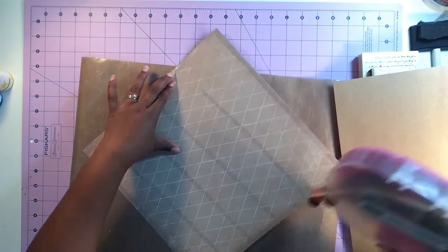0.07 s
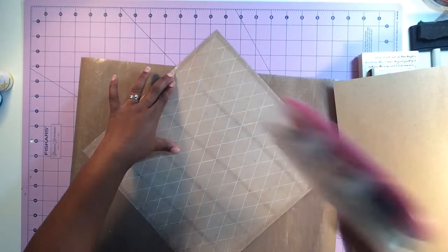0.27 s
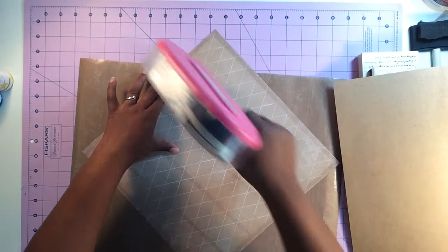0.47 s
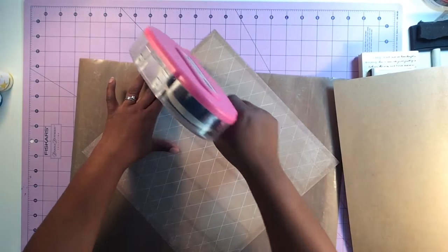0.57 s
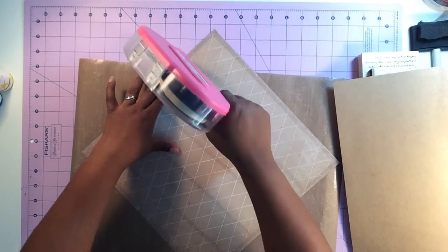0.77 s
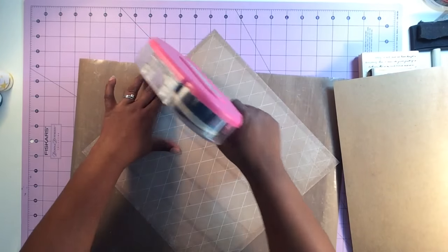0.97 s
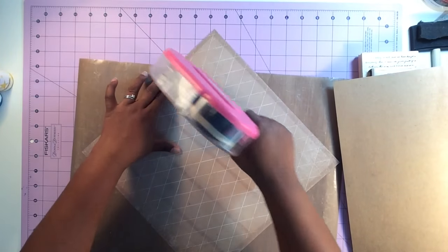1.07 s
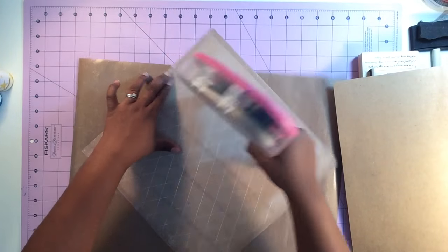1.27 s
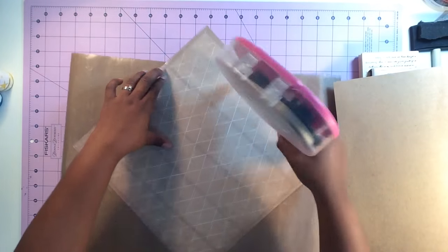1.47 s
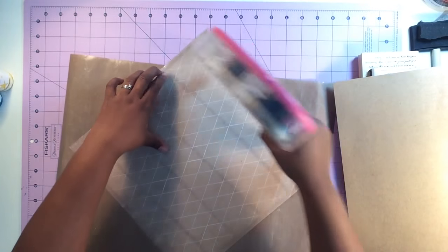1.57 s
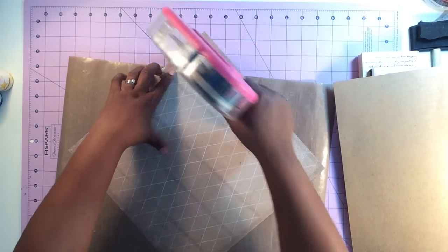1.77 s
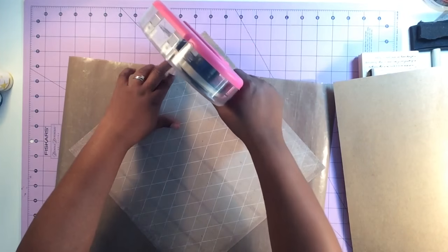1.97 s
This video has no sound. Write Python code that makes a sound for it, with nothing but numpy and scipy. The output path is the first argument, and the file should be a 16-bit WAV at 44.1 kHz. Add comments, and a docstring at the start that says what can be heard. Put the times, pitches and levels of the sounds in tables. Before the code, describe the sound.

Close up in a small room, a loose plastic tape dispenser gives one loud hollow crack with smaller clicks, knocks down on a papered craft table, rubs unevenly as tape peels, and releases with a crisp snap.

```python
"""Loose plastic clacks and rattles close to the microphone as a big tape runner is swung over a craft table.
It lands on paper on a cutting mat with a low knock, is drawn along while the tape unrolls, and lifts off with
a sharp snap. Blows are bursts of tiny impacts coloured by resonances; rubbing is a dense rain of random grains.
A small room rings briefly, the table knocks and rumbles faintly under the hands, and the air hisses softly."""
import sys
import numpy as np
from scipy import signal
from scipy.fft import rfft, irfft
from scipy.io import wavfile
from scipy.ndimage import uniform_filter1d

SR = 44100
rng = np.random.default_rng(int(sys.argv[2]) if len(sys.argv) > 2 else 0)


def wav_record(signal):
    """Record a signal, one row per channel, as 16-bit PCM in the file named by sys.argv[1]."""
    frames = np.transpose(np.atleast_2d(signal))
    bounded = np.clip(frames, -1, 1)
    # unit amplitude maps onto the largest positive 16-bit level
    quanta = np.round(bounded * 32767).astype(np.int16)
    wavfile.write(sys.argv[1], SR, quanta)


N = 89390


def case():
    """The loose plastic case clacks and scrapes: a hollow crack and a thin lingering ring."""
    # Clacks and short scrapes of the case. Each row: start in seconds, level in dB, rise of the push in
    # seconds, its t60 in seconds, tilt in dB per octave, frequency in Hz above which it is dull.
    clacks = [(.013, -52, 0.00334, 0.039, -5.5, 2000), (.0312, -50.5, 0.00085, 0.024, 3, 2300),
              (.106, -54.5, 0.00061, 0.046, 2, 11000), (.114, -67, .0005, 0.023, 8, 14000),
              (.1305, -47, 0.0002, 0.062, 2, 12000), (.142, -35.5, 0.0033, 0.13, 3.5, 10300),
              (.1775, -20, 0.0036, 0.063, 0.5, 16040), (.197, -37, 0.0064, 0.12, 7, 16000),
              (.232, -36.5, 0.0051, 0.15, 1, 7000), (.337, -51, 0.0021, 0.22, 6, 14000),
              (.383, -59.5, 0.0028, 0.071, 1, 9070), (.4415, -48, 0.0027, 0.066, 1, 7200),
              (.4615, -44.5, 0.0029, .06, -3, 2600), (.480, -47, 0.0023, .07, -7, 2800),
              (.707, -61, 0.0021, 0.029, -4, 5130), (.809, -62, 0.012, .25, 2, 9000),
              (1.030, -75, 0.0019, 0.024, 0, 9000), (1.112, -47.5, 0.0062, .13, 2, 2070),
              (1.163, -50, 0.0051, .12, 2.5, 3500), (1.300, -62, 0.0013, 0.037, -6, 12200),
              (1.3212, -44, 0.0011, 0.042, -0.5, 12100), (1.607, -57.5, 0.00024, .008, 5, 12000),
              (1.860, -53, 0.0096, .1, 0, 3530), (1.944, -56, .005, .08, -10, 6000)]
    # Contact noise. Each row: frequency in Hz, density in dB per Hz.
    crack = [(150, -11.5), (400, -3.5), (800, -2), (1400, 0), (2300, 1.5), (3500, -2), (5500, -7),
             (8000, -8), (12500, -9), (15000, -14.5)]
    # Damped resonances of the case. Each row: frequency in Hz, width in Hz, lift over the contact noise in dB.
    hollow = [(260.6, 17, 12.5), (544, 18, 13.5), (722, 60, 13.5), (1139, 95, 13), (1622, 68, 12.5),
              (1934, 50, 10), (2206, 36, 6.5), (2360, 110, 3), (2804, 37, 7), (3925, 61, 9),
              (4430, 92, 4.5), (5140, 53, 6), (6550, 100, 4), (7260, 110, 2)]
    # Lingering modes of the reels and lid. Each row: frequency in Hz, relative level in dB, t60 in seconds.
    reel_and_lid = [(253, -17, 0.31), (540, -27, 0.25), (696, 4.5, 0.49), (757, -13, 0.65),
                    (1074, -3, 0.88), (1150, -2, 0.13), (1580, 2, 0.38), (1890, -17, 0.53), (2167, 4, 0.34),
                    (2431, 2, 0.53), (2910, 8.5, 0.46), (2943, 8.5, 0.26), (3704, -7, 0.66),
                    (3935, -17, .35)]
    return strikes(clacks, colour(crack, hollow), modes(reel_and_lid), ring_db=-16)


def creaks():
    """Plastic slips on plastic in the grip and sings briefly at a rough, low pitch."""
    # Short creaks. Each row: start in seconds, level in dB, length in seconds, pitch in Hz.
    grip_creaks = [(0.16, -43.5, 0.018, 700), (0.231, -44.5, 0.043, 725), (0.427, -43.5, 0.024, 675),
                   (1.383, -53.5, 0.011, 659.4), (1.75, -59, 0.015, 665)]
    roughness = 0.37  # spread of the slow chance in the swell
    t, out = clock(), np.zeros(N)
    for start, db, length, hz in grip_creaks:
        swell = np.sin(np.pi * np.clip((t - start) / length, 0, 1))
        rough_swell = swell * (1 + roughness * walk(400))
        out += blow(rough_swell * np.sin(2 * np.pi * hz * t), db)
    return out


def slaps():
    """The head slaps down on the paper: bursts of contact through the resonances of the pressed head."""
    # Slaps. Each row: start in seconds, level in dB, rise of the push in seconds, its t60 in seconds,
    # tilt in dB per octave, frequency in Hz above which it is dull.
    landings = [(.896, -42.5, 0.0015, 0.24, 0.5, 9260), (.9062, -37.5, .003, 0.097, 3, 2600),
                (.920, -40.5, 0.0013, 0.062, .5, 8900), (.936, -44, .002, 0.091, -1.5, 3000),
                (.963, -47.5, .003, 0.072, -0.5, 4000)]
    # Noise of the landing. Each row: frequency in Hz, density in dB per Hz.
    paper_noise = [(200, -3.5), (620, -3.5), (850, -7), (1250, -9), (1800, -4.5), (2400, -9), (2750, -19),
                   (3400, -16.5), (4600, -12), (6000, -29), (8500, -24), (15000, -36)]
    # Resonances of the pressed head. Each row: frequency in Hz, width in Hz, lift over the noise in dB.
    head = [(955, 70, 9.5), (1025, 70, 4.5), (1490, 74, 3.5), (3240, 190, 12.5)]
    return strikes(landings, colour(paper_noise, head))


def stroke():
    """The roller grinds over the mat, the tape peels from its liner and the head slides on the paper."""
    # Course of the stroke. Each row: time in seconds, then the levels in dB, before the trims below,
    # of the low mids (roller), the upper mids (tape) and the treble (paper).
    course = np.array([(.8, -94, -95, -81), (1.0, -62.5, -65, -76), (1.055, -56, -63, -67.5),
                       (1.08, -54.5, -55, -56), (1.126, -53, -59, -61.5), (1.17, -53, -49, -58.5),
                       (1.2, -49.5, -54, -61), (1.23, -56, -59, -56), (1.29, -60, -60.5, -65.5),
                       (1.335, -50, -55.5, -65), (1.365, -56, -55, -62), (1.41, -58, -44.5, -58.5),
                       (1.464, -66.5, -52.5, -65), (1.534, -69.5, -53.5, -68), (1.62, -70, -49.5, -62.5),
                       (1.68, -70, -54.5, -66), (1.71, -68, -76, -53.5), (1.8, -61.5, -66, -73.5),
                       (1.92, -68, -72, -80.5)])
    # Spectra of roller on mat, peeling tape and sliding paper. Each row: frequency in Hz, density in dB per Hz.
    roll_spectrum = [(120, -16), (230, -3.5), (340, -3.5), (450, 0), (680, -1), (830, -10), (1100, -6.5),
                     (1320, -6), (1600, -7), (2400, -16.5), (6000, -38.5)]
    peel_spectrum = [(700, -34), (1400, -13), (1850, -2), (2700, -0.5), (3600, -5), (4500, -6.5),
                     (6000, -11), (12000, -24)]
    slide_spectrum = [(2000, -31), (4500, -10.5), (6500, -4.5), (9000, -0.5), (12500, -1), (15500, -5.5)]
    roll_db, peel_db, slide_db = 0, -3.5, -0.5  # trims
    roll_grains = grains(per_s=2500, spread_db=2.2, flutter_db=0.95)
    peel_grains = grains(per_s=4000, spread_db=1.4, flutter_db=0.83)
    slide_grains = grains(per_s=16000, spread_db=1.6, flutter_db=0.6)
    roll = amp(roll_db) * steady(roll_grains, roll_spectrum, course[:, [0, 1]])
    peel = amp(peel_db) * steady(peel_grains, peel_spectrum, course[:, [0, 2]])
    slide = amp(slide_db) * steady(slide_grains, slide_spectrum, course[:, [0, 3]])
    return roll + peel + slide


def snaps():
    """The tape snaps free and the reel settles: bright bursts through the resonances of the tape reel."""
    # Snaps. Each row: start in seconds, level in dB, rise of the push in seconds, its t60 in seconds,
    # tilt in dB per octave, frequency in Hz above which it is dull.
    releases = [(1.6842, -38.5, 0.00018, 0.0034, 0.5, 12100), (1.685, -38, 0.0014, 0.056, -0.5, 15000),
                (1.692, -43.5, 0.0016, 0.059, 5, 13900)]
    # Noise of the snap. Each row: frequency in Hz, density in dB per Hz.
    snap_noise = [(200, -19), (700, -21), (1800, -8), (2300, -12), (2800, 0.5), (3500, -1.5), (4800, -1),
                  (7500, -5), (10000, -3), (13000, -3.5), (15500, -11)]
    # Resonances of the tape reel. Each row: frequency in Hz, width in Hz, lift over the noise in dB.
    reel = [(3030, 140, 1), (3370, 170, 4), (3920, 190, 5)]
    return strikes(releases, colour(snap_noise, reel))


def grip():
    """The hand rustles on the case: grains of friction, dull and uneven."""
    # Course of the rustle. Each row: time in seconds, level in dB.
    handling = [(0, -58), (.04, -53.5), (.09, -60), (.13, -62.5), (.3, -60), (.4, -59.5), (.5, -64),
                (.56, -66), (.7, -78)]
    # Spectrum of the rustle. Each row: frequency in Hz, density in dB per Hz.
    rustle = [(100, -19), (180, -2.5), (500, -7), (900, -12.5), (1900, -8.5), (4000, -16.5), (8000, -24.5),
              (15000, -31)]
    return steady(grains(per_s=3100, spread_db=2.7, flutter_db=0.8), rustle, handling)


def table_top():
    """Soft knocks flex the table briefly and leave it ringing; the hands keep it rumbling."""
    # Knocks. Each row: centre in seconds, level in dB, half length of the swell in seconds, frequency in Hz.
    table_knocks = [(.566, -53.5, 0.0082, 90), (.590, -56, 0.0066, 91.4), (0.623, -64, 0.007, 90),
                    (0.671, -53.5, .01, 81), (.714, -47.5, .006, 86.5), (0.752, -51, 0.0075, 91),
                    (.821, -48.5, 0.0069, 90), (0.848, -55, 0.006, 90), (.9025, -26, .0052, 103),
                    (0.923, -39.5, .008, 60), (0.964, -44.5, 0.0051, 75), (0.994, -49, 0.0039, 99),
                    (1.088, -50.5, 0.0037, 105), (1.338, -52.5, 0.014, 48), (1.765, -52, 0.0031, 106),
                    (1.858, -56, 0.0087, 75)]
    # Modes of the table. Each row: frequency in Hz, relative level in dB, t60 in seconds.
    table_modes = [(44, -1, 0.35), (72, -19.5, 0.19), (125.6, -3, 0.31)]
    # Spectrum of the rumble. Each row: frequency in Hz, density in dB per Hz.
    rumble_spectrum = [(20, -23), (45, -1), (73, 2.5), (110, 0), (165, 2), (200, -9.5), (250, -1),
                       (330, -15.5), (700, -41)]
    # Course of the rumble. Each row: time in seconds, level in dB.
    rumble_course = [(0, -66.5), (.3, -61), (.38, -59.5), (.8, -60.5), (1.0, -60), (1.2, -66.5),
                     (1.38, -60.5), (1.6, -68.5), (1.8, -61), (2.03, -65.5)]
    ring_db = -20  # energy of the ring against all the knocks
    t, knocks = clock(), np.zeros(N)
    for centre, db, half, hz in table_knocks:
        swell = np.exp(-.5 * ((t - centre) / half) ** 2)
        knocks += blow(-np.sin(2 * np.pi * hz * (t - centre)) * swell, db)
    ring = unit(through(knocks, modes(table_modes))) * np.sqrt(np.sum(knocks ** 2))
    rumble = steady(rng.standard_normal(N), rumble_spectrum, rumble_course)
    return knocks + amp(ring_db) * ring + rumble


def air_noise():
    """Faint constant noise of the air, weighted to the lows."""
    # Spectrum of the air. Each row: frequency in Hz, density in dB per Hz.
    air_spectrum = [(150, -3.5), (250, -1), (400, -11.5), (800, -16.5), (1600, -18), (4000, -23),
                    (9000, -29), (15000, -41)]
    air_db = -67
    return through(rng.standard_normal(N), colour(air_spectrum)) * amp(air_db)


def reflections(x, count=7):
    """The table top and nearby things throw the sound back within a few milliseconds."""
    level_db, nearest_s, farthest_s = -7.5, .0004, .004
    taps = np.zeros(N)
    for place, sign in rng.random((count, 2)):
        delay = nearest_s + place * (farthest_s - nearest_s)
        taps[int(SR * delay)] += np.sign(sign - .5)
    return x + amp(level_db) * through(x, unit(taps))


def room(x):
    """Diffuse tail of a small room: noise whose bands each die at their own pace."""
    # Decay of the room. Each row: frequency in Hz, t60 in seconds.
    room_decay = [(100, 0.33), (500, 0.35), (1500, 0.22), (4000, 0.34), (9000, 0.32), (15000, 0.23)]
    level_db, build_s, low_hz = -9.5, 0.0079, 258  # the tail is thin below low_hz
    t, (hz, t60) = clock(), np.array(room_decay).T
    f = np.fft.rfftfreq(N, 1 / SR) + 1
    noise = rfft(rng.standard_normal(N)) * f ** 2 / (f ** 2 + low_hz ** 2)
    tail = np.zeros(N)
    for share, decay in zip(np.eye(len(hz)), t60):
        # neighbouring bands cross-fade over log frequency
        band = irfft(noise * np.interp(np.log(f), np.log(hz), share), N)
        tail += band * np.exp(-np.log(1000) * t / decay)
    tail *= 1 - np.exp(-t / build_s)
    return x + amp(level_db) * through(x, unit(tail))


def strikes(table, body, ring=None, ring_db=0):
    """Each contact chatters against a body and may leave its modes ringing."""
    out, hz = np.zeros(2 * N), np.geomspace(100, 20000, 16)
    for start, db, rise, t60, tilt_db, dull_hz in table:
        dulling_db = 10 * np.log10(1 + (hz / dull_hz) ** 4)
        softness = colour(np.c_[hz, tilt_db * np.log2(hz) - dulling_db])
        contact = through(chatter(rise, t60), softness)
        hit, at = blow(through(contact, body), db), int(start * SR)
        out[at:at + len(hit)] += hit
        if ring is not None:
            at += int(rise * SR)  # the ring starts when the push is full
            out[at:at + N] += blow(through(ring, softness), db + ring_db)
    return out[:N]


def chatter(rise, t60, size=16384):
    """A burst of tiny impacts that swells and dies, about equally strong at all frequencies."""
    age = np.arange(size) / SR
    push = np.minimum(age / rise, 1) * np.exp(-np.log(1000) * np.maximum(age - rise, 0) / t60)
    spectrum = rfft(push * rng.standard_normal(size))
    flat = irfft(spectrum / (np.abs(spectrum) + 1e-12))
    return unit(flat * np.sqrt(np.sqrt(push)))  # flattening smears the burst, so it is shaped once more


def grains(per_s, spread_db, flutter_db):
    """Dense tiny slips of uneven size, at random moments and of either sign."""
    uneven_db = spread_db * np.minimum(rng.exponential(size=N), 5)
    size = amp(uneven_db + flutter_db * walk(70))
    return (rng.random(N) < per_s / SR) * rng.choice([-1, 1], N) * size


def steady(source, spectrum, curve):
    """A coloured source that follows a curve of (seconds, dB)."""
    x = through(source, colour(spectrum))
    return x / x.std() * amp(np.interp(clock(), *np.array(curve, float).T))


def colour(points, peaks=(), size=4096):
    """Causal response of a spectrum of (Hz, dB) points with (Hz, width, dB) resonances on top."""
    hz, db = np.array(points, float).T
    f = np.maximum(np.fft.rfftfreq(size, 1 / SR), 1)
    gain = amp(np.interp(np.log(f), np.log(hz), db))
    gain = gain * np.minimum(f / hz[0], 1) ** 2  # falls away below the first point
    power = 1
    for centre, width, lift in peaks:
        power = power + amp(lift) ** 2 / (1 + (2 * (f - centre) / width) ** 2)
    gain = gain * np.sqrt(power)
    # folding the cepstrum gives minimum phase: the response starts at once
    cepstrum = irfft(np.log(gain))
    cepstrum[1:size // 2] *= 2
    cepstrum[size // 2 + 1:] = 0
    return unit(irfft(np.exp(rfft(cepstrum))))


def modes(table):
    """Decaying sines of (Hz, dB, t60) modes, each from a random phase."""
    t, out = clock(), np.zeros(N)
    for hz, db, t60 in table:
        sine = np.sin(2 * np.pi * (hz * t + rng.random()))
        out += amp(db) * sine * np.exp(-np.log(1000) * t / t60)
    return unit(out)


def walk(rate):
    """Smoothed random steps, rate per second, with a spread of one."""
    k = int(SR / rate)
    steps = np.repeat(rng.standard_normal(N // k + 1), k)
    w = uniform_filter1d(steps, k)[:N]
    return w / w.std()


def through(x, response):
    """Pass a sound through a body or room."""
    return signal.fftconvolve(x, response)[:N]


def blow(x, db):
    """Set the level of a short sound: its energy as if spread over 10 ms."""
    spread_s = .01
    return unit(x) * np.sqrt(spread_s * SR) * amp(db)


def unit(x):
    """Scale to an energy of one."""
    return x / np.sqrt(np.sum(x ** 2) + 1e-30)


def amp(db):
    """Decibels to gain."""
    return 10 ** (np.asarray(db) / 20)


def clock():
    """Time of every sample in seconds."""
    return np.arange(N) / SR


def scene():
    """Runner in the room, table knocks and rumble straight to the microphone, over faint air noise."""
    head = slaps() + stroke() + snaps()
    runner = case() + creaks() + reflections(head) + grip()
    return (room(runner) + table_top() + air_noise())[None]


def record(dry):
    """The recorder cuts the top steeply above 15.25 kHz."""
    low_pass = signal.ellip(10, .2, 80, 15250, fs=SR, output="sos")  # order, ripple dB, stop dB, Hz
    return signal.sosfilt(low_pass, dry)


dry = scene()
out = record(dry)
wav_record(out)
```